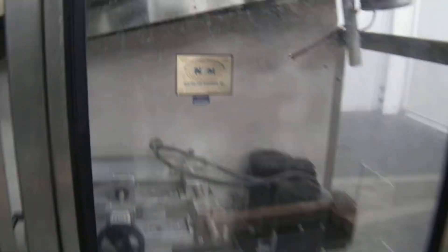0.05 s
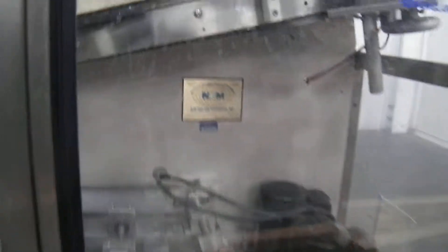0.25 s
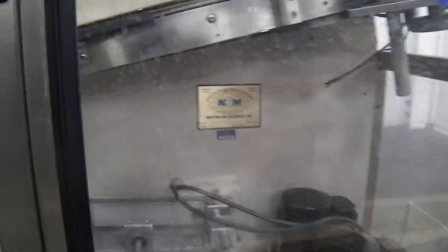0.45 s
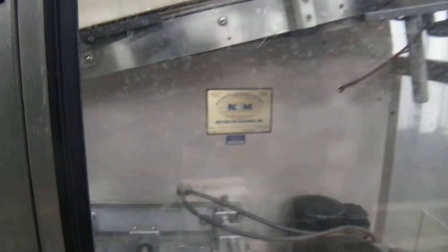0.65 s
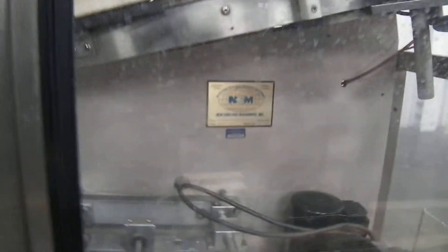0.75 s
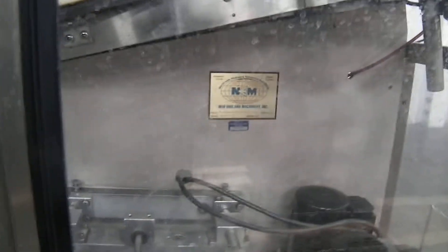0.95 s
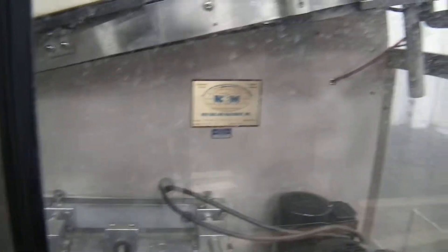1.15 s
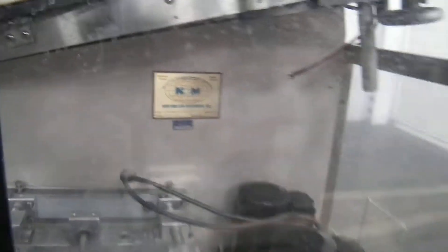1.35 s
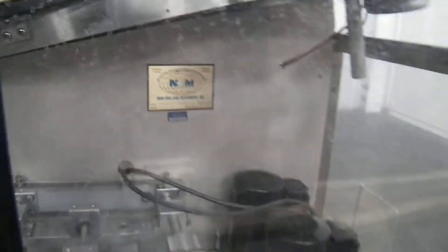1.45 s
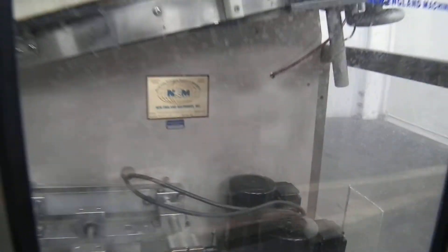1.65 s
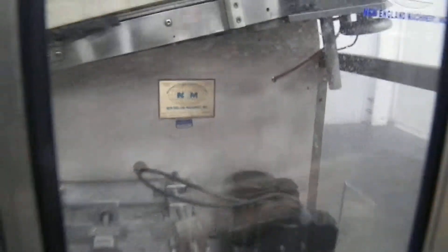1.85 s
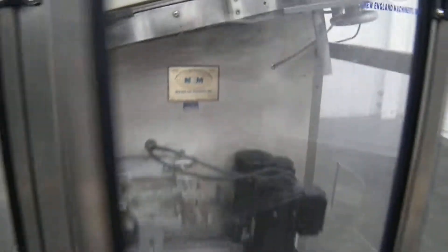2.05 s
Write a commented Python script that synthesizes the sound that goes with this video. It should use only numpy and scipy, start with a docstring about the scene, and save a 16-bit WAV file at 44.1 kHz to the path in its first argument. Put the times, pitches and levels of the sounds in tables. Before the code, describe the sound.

A machine's guard door bangs shut close by at about 0.7 seconds, its latch clattering and the panel knocking against the ringing metal frame, with a sharp click at 0.8. Soft bumps come just before it. The factory hall's echo fades over roughly a second, while light metal ticks, scuffs and dull bumps follow from 1.2 to 1.9 seconds. Ventilation fans rush and hum quietly throughout.

```python
"""In a large factory hall, a machine's glazed guard door bangs shut close by.
Its metal latch clatters, the panel knocks against the ringing metal frame and the hall echoes on.
Each hard hit is a quickly fading burst of noise plus the ringing tones of the parts it shakes.
Soft bumps and scuffs come before and after the bang, and loose metal ticks lightly after it.
Behind it all, ventilation fans rush and their motors hum."""
import sys
import numpy as np
from scipy import signal
from scipy.fft import irfft
from scipy.io import wavfile
from scipy.ndimage import uniform_filter1d

SR = 44100
rng = np.random.default_rng(int(sys.argv[2]) if len(sys.argv) > 2 else 0)


def store_wav(level_fs):
    """Save 16-bit WAV to argv[1]."""
    pcm = np.round(np.clip(np.atleast_2d(level_fs), -1, 1) * 32767)
    wavfile.write(sys.argv[1], SR, pcm.T.astype(np.int16))


N = 92610  # 2.1 seconds

# A TONE table says how strong each pitch is, from bass to treble.
# fade_s is the time to die away by 60 dB. A pan_db above zero means louder on the left.
# Rush of the fans: pitch_hz, level_db
FAN_TONE = [(20, -20), (30, -8), (46, -17.5), (66, 1), (95, -5), (128, -3), (190, -7.5), (350, -13.5),
            (480, -21.5), (610, -13.5), (730, -18), (950, -20.5), (1200, -17.5), (2100, -15), (2500, -21),
            (4200, -21), (6900, -33.5), (10000, -41.5), (15000, -28.5)]
# Which side the rush leans to: pitch_hz, pan_db
FAN_PAN = [(60, 1.5), (250, 0.5), (600, 1.5), (1650, -2.5), (5000, -0.5), (15000, 0.5)]
# Hum of the fan motors: pitch_hz, level_db
MOTOR_HUM = [(61, -43.5), (120, -47), (600, -63), (718, -50.5)]
# How long the hall echoes: pitch_hz, fade_s
HALL_FADES = [(100, 1.93), (300, 1.07), (800, 1.33), (2000, 1.65), (4000, 1.46), (7000, 0.97),
              (14000, 0.51)]
# Tone of the echo: pitch_hz, level_db
HALL_TONE = [(60, -6), (120, 2), (230, -2), (450, -4), (1000, -10.5), (2600, -1), (3400, -7.5), (3950, 0.5),
             (4800, -1), (7000, -5), (10000, -10.5), (15000, -4)]
# Soft handling bumps: start_s, level_db, pitch_hz, fade_s
BUMPS = [(0.226, -25, 208, 0.019), (0.245, -23.5, 235, 0.028), (.468, -25, 86, 0.046),
         (1.144, -22, 154.3, 0.029), (1.431, -29, 98, 0.058), (1.589, -38, 178, 0.0087)]
# Scuffs: middle_s, half_length_s, level_db, pitch_hz, width_octaves
SCUFFS = [(0.453, 0.12, -41.5, 4940, 1), (0.638, 0.082, -39.5, 4500, 2.7), (1.245, 0.042, -39, 450, 0.94),
          (1.359, 0.023, -28, 3920, 0.69), (1.384, 0.049, -38.5, 1505, 0.29),
          (1.541, 0.032, -34, 2250, 1.03), (1.599, 0.07, -33, 328, 1.12), (1.608, 0.021, -33.5, 4500, 0.71),
          (1.831, 0.03, -41.5, 5400, 0.93), (1.897, 0.032, -38.5, 392, 2.3)]
# Light ticks of loose metal: start_s, level_db, pan_db
TICKS = [(0.8075, -19, 3), (0.8116, -15.5, 6), (1.189, -38.5, 3), (1.205, -29.5, -5), (1.23, -37, -10),
         (1.267, -29.5, -7), (1.469, -37, -1), (1.559, -34.5, 7), (1.5741, -21, -10), (1.5991, -28, -12),
         (1.6025, -43, -11), (1.6131, -26, -7), (1.8949, -27.5, 0.5)]
# Bright noise of a tick: pitch_hz, level_db
TICK_TONE = [(200, -26), (2000, -36), (4900, -6.5), (5800, 4), (6600, 8.5), (8500, -28), (15000, -8)]
# Tiny snap that opens a tick: pitch_hz, level_db
SNAP_TONE = [(300, -10), (3000, 1), (7000, 4), (15000, 1)]
# Chatter of the loose latch: pitch_hz, level_db
RATTLE_TONE = [(300, -29), (2100, -14), (3000, 0), (4300, 7), (6500, 15), (10000, -16), (15000, -16)]
# Main strikes of the latch: start_s, level_db, fade_s, pan_db
LATCH_STRIKES = [(0.6713, -23, 0.04, -2), (0.6763, -14, 0.056, -12.5), (0.6822, -13, 0.016, 16),
                 (0.689, -16, 0.036, 16), (0.6944, -16.5, 0.021, -15), (0.702, -8, 0.011, 8),
                 (0.7041, -11.5, 0.01, 21), (0.7124, -17, 0.033, -20), (0.7289, -12, 0.019, 11),
                 (0.7351, -16, 0.024, -10), (0.8026, -9, 0.0099, 10.5), (0.8049, -11, 0.0024, 6)]
# Tone of a latch strike: pitch_hz, level_db
LATCH_TONE = [(100, -8.5), (400, -7.5), (2100, -7.5), (3100, 0.5), (3900, -4.5), (4900, -3), (5700, 3.5),
              (7200, 5.5), (10000, -1.5), (15000, -5.5)]
# Knocks of the panel on the frame: start_s, thud_db, crack_db
PANEL_KNOCKS = [(0.672, -20.5, -38), (0.6787, -19.5, -22.5), (0.6938, -23, -14), (0.7151, -10, -17.5),
                (0.717, -26, -14), (0.7295, -8, -7), (0.7314, -10.5, -11), (0.735, -13.5, -14.5),
                (0.7401, -15.5, -8.5), (0.7467, -14, -10.5), (.7515, -14, -30), (0.7616, -7, -19),
                (0.769, -2.5, -8), (0.7731, -14, -25), (.785, -11.5, -21), (.7935, -13, -35),
                (.803, -21.5, -16)]
# Deep thud of a knock: pitch_hz, level_db
THUD_TONE = [(40, -17), (100, -2), (230, 6), (420, 1), (800, -2), (1300, -6), (2200, -12), (4000, -29),
             (8000, -26), (15000, -12.5)]
# How long the thud lasts: pitch_hz, fade_s
THUD_FADES = [(100, 0.11), (300, 0.097), (800, 0.17), (2000, 0.044), (8000, 0.044)]
# Sharp crack of a knock: pitch_hz, level_db
CRACK_TONE = [(100, -12), (700, 1), (1500, -0.5), (2300, -10), (3200, 1), (6000, -6), (10000, -9.5),
              (15000, -11)]
# Ringing tones of the panel: pitch_hz, level_db, fade_s
PANEL_RING = [(117.8, 1, 0.43), (162.5, -7, 0.79), (210, -1.5, 0.52), (265.5, 1, 0.24), (327.5, -3, 0.45),
              (395, -7, 0.14), (538, 4, 0.065), (568, -2.5, 0.3), (745, -3, 0.098), (913, -6, 0.2),
              (1310, -2, 0.24)]
# Ringing tones of the metal frame: pitch_hz, level_db, fade_s
FRAME_RING = [(2617, -12.5, 0.39), (3195, 3.5, 0.031), (3526, -4, 0.12), (3740, 2, 0.25), (3945, -16, 1),
              (3916, -15, 0.95), (4450, 1, 0.13), (4880, -13, 0.11), (7068, -2, 0.085)]
# How alike scattered sound is left and right (1 is the same): pitch_hz, likeness
STEREO_LIKENESS = [(60, 0.99), (130, 0.99), (290, 0.93), (640, 0.8), (1410, 0.24), (3100, -0.035),
                   (6820, -0.23), (15000, 0.12)]
# Tone of near sounds at the right microphone: pitch_hz, level_db
RIGHT_MIC_TONE = [(1500, 0), (5000, 0), (7200, -2), (9500, 0.5), (14000, 4.5)]
# Tone of both microphone openings: pitch_hz, level_db
MIC_TONE = [(1000, -0.5), (7500, -2), (7950, -30), (8350, -10), (8800, -20.5), (9500, -4), (10300, -2.5),
            (11100, -11), (11750, -23), (12300, -21), (13300, -12.5), (15000, -28)]


def amp(db):
    """Turns decibels into a number to multiply by."""
    return 10 ** (np.asarray(db) / 20)


def value_at(table, hz):
    """Reads a table at any pitch, sliding smoothly between its rows."""
    pitches, values = np.transpose(table)
    return np.interp(np.log(hz + 1), np.log(pitches + 1), values)


def unit_level(x):
    """Scales a signal to an average power of 1."""
    return x / np.sqrt(np.mean(x ** 2) + 1e-20)


def unit_hit(x):
    """Gives a hit the energy of 5 ms at full level."""
    return unit_level(x) * np.sqrt(.005 * SR / x.shape[-1])


def fade(t, fade_s):
    """A curve that falls by 60 dB every fade_s seconds."""
    return np.exp(-np.log(1000) * t / fade_s)


def add(mix, start_s, sound):
    """Mixes a sound in at the given time."""
    part = mix[:, round(start_s * SR):][:, :sound.shape[-1]]
    part += sound[..., :part.shape[1]]


def pan(db):
    """Left and right gains that place a sound to one side."""
    return amp([[db / 2], [-db / 2]])


def colour(x, tone):
    """Filters a sound by a tone table, without smearing it earlier in time."""
    log_gain = np.log(amp(value_at(tone, abs(np.fft.fftfreq(8192, 1 / SR)))))
    response = np.exp(np.conj(signal.hilbert(log_gain)))
    taps = np.fft.ifft(response).real[:4096]
    return signal.fftconvolve(x, taps[None], axes=1)[:, :x.shape[1]]


def from_left(x, delay_s):
    """Sound from the left reaches the right microphone a little later, with a changed tone."""
    late = np.interp(np.arange(N) - delay_s * SR, np.arange(N), x[1])
    return np.array([x[0], colour(late[None], RIGHT_MIC_TONE)[0]])


def scattered_noise(size):
    """Pitches and two noise spectra: left and right are alike in the bass, unlike in the treble."""
    hz = np.fft.rfftfreq(size, 1 / SR)
    left, other = np.exp(2j * np.pi * rng.random((2, len(hz))))
    likeness = value_at(STEREO_LIKENESS, hz)
    right = likeness * left + np.sqrt(1 - likeness ** 2) * other
    return hz, np.array([left, right])


def fading_noise(fades, size):
    """Countless vibrations blur into noise, each band of pitches dying at its own speed."""
    hz, spectra = scattered_noise(size)
    t = np.arange(size) / SR
    pitches, fade_times = np.transpose(fades)
    out = np.zeros((2, size))
    for only_this_row, fade_s in zip(np.eye(len(fades)), fade_times):
        band = value_at(list(zip(pitches, only_this_row)), hz)
        out += irfft(spectra * band, size) * fade(t, fade_s)
    return out


def ring(tones):
    """A struck part rings with a few pure, fading tones."""
    t = np.arange(SR) / SR
    waves = (amp(db) * np.sin(2 * np.pi * hz * t) * fade(t, fade_s) for hz, db, fade_s in tones)
    return unit_hit(sum(waves))


def clack(tone, fade_s, direct_share=0.65):
    """A hard contact makes a short noise burst; the direct share reaches both sides alike."""
    direct = fading_noise([(1000, fade_s)], size=4096)[:1]
    scattered = fading_noise([(1000, fade_s)], size=4096)
    burst = np.sqrt(direct_share) * direct + np.sqrt(1 - direct_share) * scattered
    return unit_hit(colour(burst, tone))


def ventilation(level_db=-32, rise_db_per_s=0.5, flicker_db=1.5, wander_hz=4.36):
    """Fans rumble and rush while their motors hum with a wavering pitch; the rush as heard slowly grows a
    little louder as time goes on."""
    hz, spectra = scattered_noise(N)
    rush = irfft(spectra * amp(value_at(FAN_TONE, hz)) * pan(value_at(FAN_PAN, hz))[:, 0], N)
    # Small patches of pitch and time flicker in level, less so in the rumble below 303 Hz.
    band_hz, _, bands = signal.stft(rush, fs=SR, nperseg=1024)
    patches = uniform_filter1d(rng.standard_normal(bands.shape[1:]), size=12, axis=0)
    patches = unit_level(uniform_filter1d(patches, size=8, axis=1))
    depth_db = flicker_db * np.minimum(band_hz / 303, 1)[:, None]
    air = signal.istft(bands * amp(depth_db * patches), nperseg=1024)[1][:, :N]
    from_middle_s = (np.arange(N) - N / 2) / SR
    out = amp(level_db + rise_db_per_s * from_middle_s) * unit_level(air)
    for pitch_hz, db in MOTOR_HUM:
        wander = wander_hz * unit_level(uniform_filter1d(rng.standard_normal(N), size=3000))
        out += amp(db) * unit_level(np.sin(2 * np.pi * np.cumsum(pitch_hz + wander) / SR))
    return out


def hall_echo(x, bass_below_hz=494, bass_build_s=0.023, treble_build_s=0.013):
    """The long echo of the hall builds up, slowest in the bass, and dies away."""
    tail = fading_noise(HALL_FADES, size=65536)
    t = np.arange(tail.shape[1]) / SR
    bass = signal.sosfiltfilt(signal.butter(2, bass_below_hz, fs=SR, output="sos"), tail)
    treble = tail - bass
    tail = bass * (1 - np.exp(-t / bass_build_s)) + treble * (1 - np.exp(-t / treble_build_s))
    tail = colour(tail / np.linalg.norm(tail[0]), HALL_TONE)
    return signal.fftconvolve(x[:1], tail, axes=1)[:, :N]


def handling(bump_rise_s=0.0028):
    """Handling makes dull bumps (low, fading tones) and scuffs (short swells of noise)."""
    out, t = np.zeros((2, N)), np.arange(N) / SR
    rise = 1 - np.exp(-t / bump_rise_s)
    for start_s, db, hz, fade_s in BUMPS:
        bump = np.sin(2 * np.pi * hz * t) * rise * fade(t, fade_s)
        add(out, start_s, amp(db) * unit_hit(bump))
    for middle_s, half_length_s, db, pitch_hz, width_octaves in SCUFFS:
        hz, spectra = scattered_noise(N)
        band = np.exp(-.5 * (np.log2((hz + 1) / pitch_hz) / width_octaves) ** 2)
        swell = np.exp(-((t - middle_s) / half_length_s) ** 2)
        out += amp(db) * unit_level(irfft(spectra * band, N)) * swell
    return out


def metal_ticks(snap_db=-7.5, clink_db=-5.5, clink_hz=6310, clink_fade_s=0.005):
    """Loose metal parts touch lightly: a bright tick with a snap and a short clink."""
    out = np.zeros((2, N))
    clink = amp(clink_db) * ring([(clink_hz, 0, clink_fade_s)])
    for start_s, db, pan_db in TICKS:
        touch = clack(TICK_TONE, fade_s=0.016) + amp(snap_db) * clack(SNAP_TONE, fade_s=0.0024)
        add(out, start_s, amp(db) * pan(pan_db) * (touch + clink[:touch.shape[1]]))
    return from_left(out, delay_s=0.0002185)


def latch_rattle(start_s=0.674, end_s=0.75, contacts_per_s=830, level_db=-20, spread_db=5):
    """The loose latch chatters with many tiny random contacts while the door closes."""
    t = np.arange(N) / SR
    closing = (t > start_s) & (t < end_s)
    contacts = closing * (rng.random((2, N)) < contacts_per_s / SR)
    strengths = amp(spread_db * rng.standard_normal((2, N)))
    chatter = signal.fftconvolve(contacts * strengths, clack(RATTLE_TONE, fade_s=0.018), axes=1)
    return amp(level_db) * unit_level(chatter[:, :N]) * np.sqrt(closing.mean())


def latch_strikes(frame_ring):
    """Metal hits metal: each strike of the latch clacks and sets the frame ringing."""
    out = np.zeros((2, N))
    for start_s, db, fade_s, pan_db in LATCH_STRIKES:
        add(out, start_s, amp(db) * pan(pan_db) * clack(LATCH_TONE, fade_s))
        add(out, start_s, amp(db) * frame_ring)
    return from_left(out, delay_s=0.0002185)


def panel_knocks(frame_ring, push_db=-8, ring_db=-12):
    """The panel hits the frame: a push of air, a thud and a crack, and both parts ring."""
    out = np.zeros((2, N))
    push = amp(push_db) * unit_hit(colour(signal.unit_impulse(SR)[None], THUD_TONE))
    panel_ring = amp(ring_db) * ring(PANEL_RING)
    for start_s, thud_db, crack_db in PANEL_KNOCKS:
        thud = unit_hit(colour(fading_noise(THUD_FADES, size=8192), THUD_TONE))
        add(out, start_s, amp(thud_db) * thud)
        add(out, start_s, amp(thud_db) * (push + panel_ring))
        add(out, start_s, amp(crack_db) * clack(CRACK_TONE, fade_s=0.013))
        add(out, start_s, amp(crack_db) * frame_ring)
    return pan(db=1) * from_left(out, delay_s=0.00007)


def door_bang(frame_db=-10.5):
    """Latch and panel hit the metal frame many times in quick succession, making one bang."""
    frame_ring = amp(frame_db) * ring(FRAME_RING)
    return latch_strikes(frame_ring) + panel_knocks(frame_ring) + latch_rattle()


def scene(door_echo_db=-4.5, tick_echo_db=-8):
    """Mixes the door, the ticks and their echo with the handling sounds and the fans."""
    bang, ticks = door_bang(), metal_ticks()
    echo = hall_echo(amp(door_echo_db) * bang + amp(tick_echo_db) * ticks)
    return bang + ticks + echo + pan(db=1) * handling() + ventilation()


def record(dry, threshold_db=-22, squeeze=0.49, recover_db_per_s=45, attack_s=0.0044, top_hz=15600):
    """The microphones colour the sound; loud parts are turned down, peaks clipped, top treble cut."""
    x = colour(dry, MIC_TONE)
    keep = np.exp(-1 / (attack_s * SR))
    smoother = [1 - keep], [1, -keep]
    power_db = 10 * np.log10(signal.lfilter(*smoother, (x ** 2).mean(0)) + 1e-12)
    # Each peak is remembered and let go slowly, so the volume creeps back after the bang.
    fall_db = np.arange(N) / SR * recover_db_per_s
    held_db = np.maximum.accumulate(power_db + fall_db) - fall_db
    cut_db = squeeze * signal.lfilter(*smoother, np.maximum(held_db - threshold_db, 0))
    x = np.clip(x / amp(cut_db), -1, 1)
    treble_cut = signal.firwin(255, top_hz, window=("kaiser", 9), fs=SR)
    return signal.oaconvolve(x, treble_cut[None], "same")


dry = scene()
out = record(dry)
store_wav(out)
```